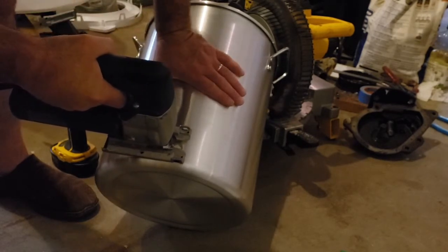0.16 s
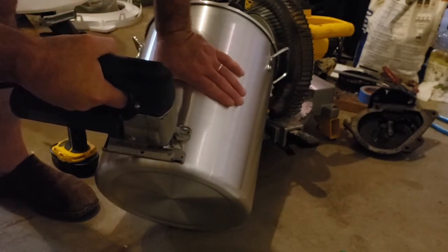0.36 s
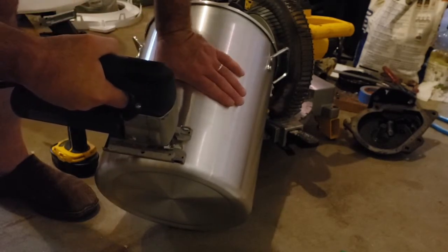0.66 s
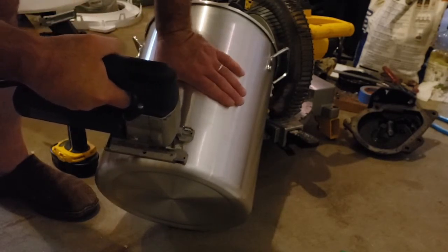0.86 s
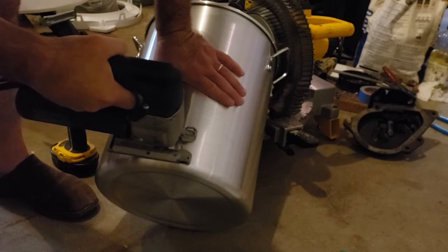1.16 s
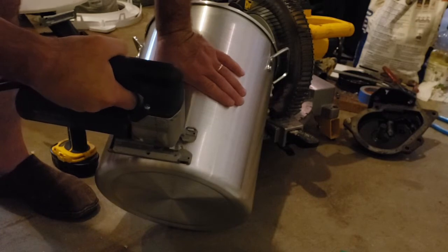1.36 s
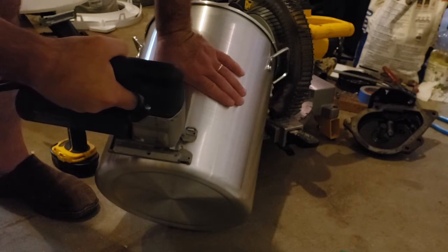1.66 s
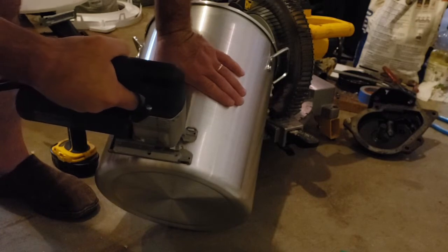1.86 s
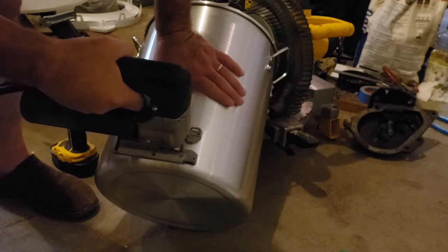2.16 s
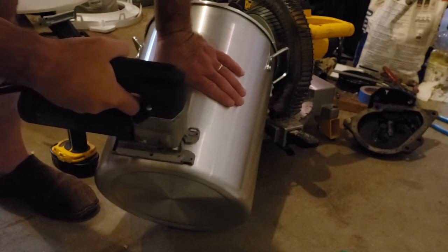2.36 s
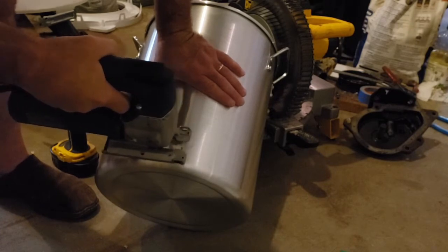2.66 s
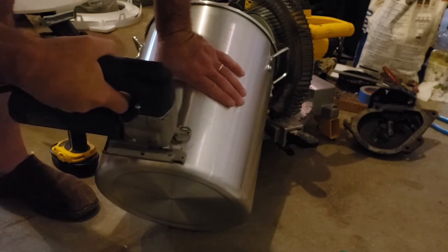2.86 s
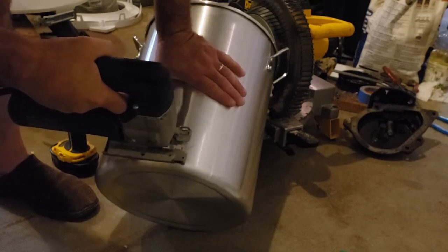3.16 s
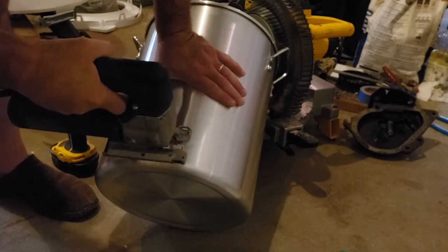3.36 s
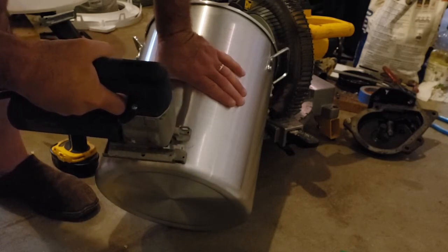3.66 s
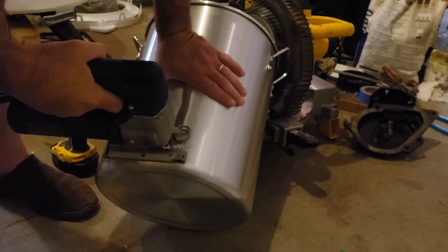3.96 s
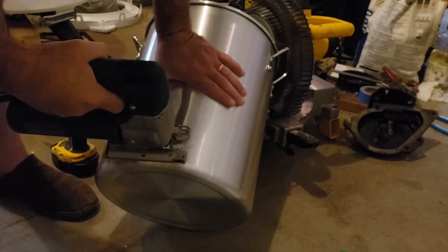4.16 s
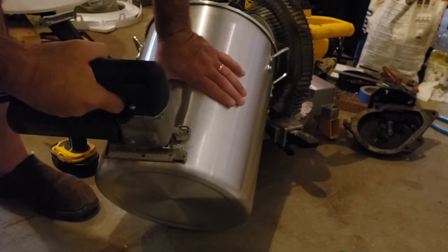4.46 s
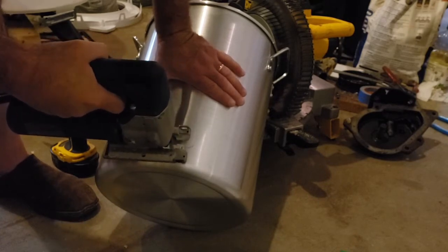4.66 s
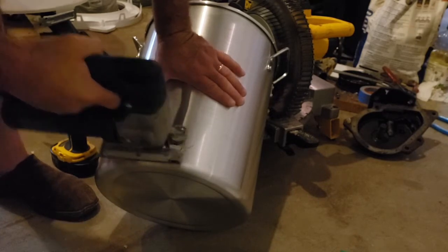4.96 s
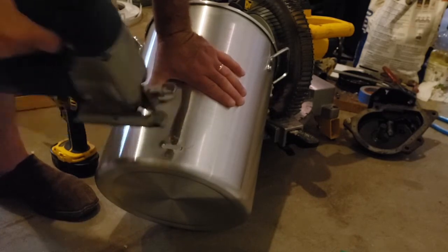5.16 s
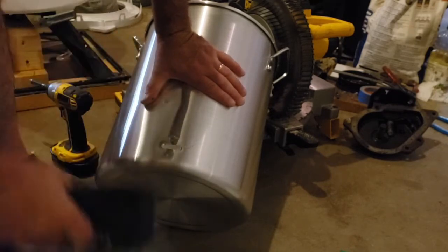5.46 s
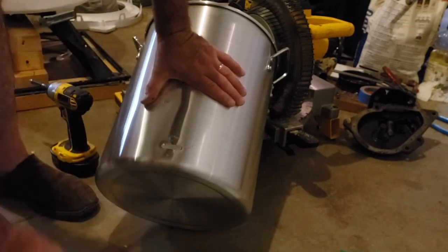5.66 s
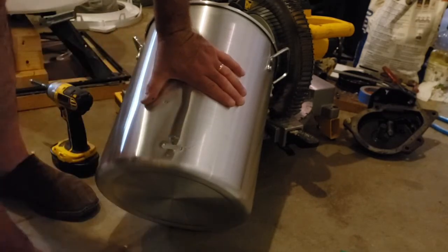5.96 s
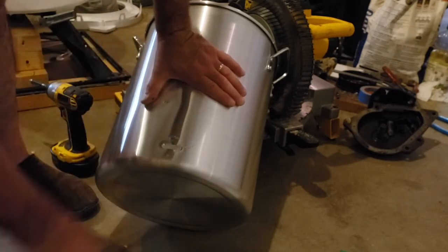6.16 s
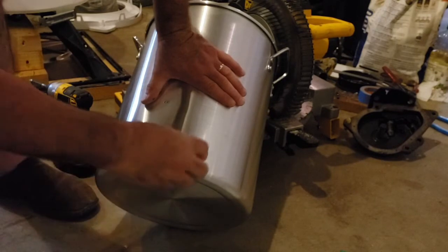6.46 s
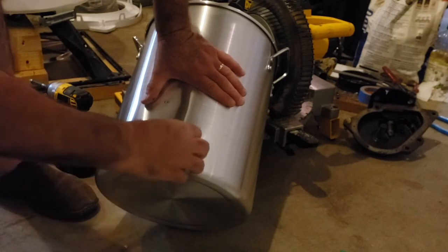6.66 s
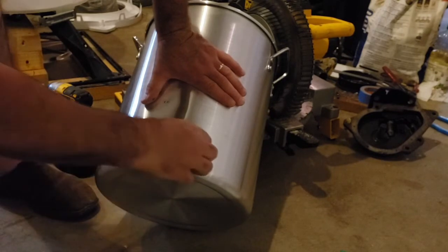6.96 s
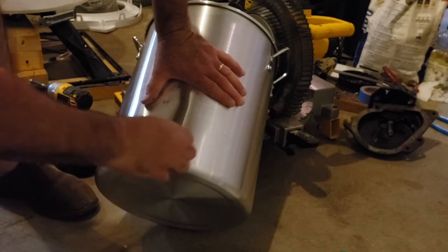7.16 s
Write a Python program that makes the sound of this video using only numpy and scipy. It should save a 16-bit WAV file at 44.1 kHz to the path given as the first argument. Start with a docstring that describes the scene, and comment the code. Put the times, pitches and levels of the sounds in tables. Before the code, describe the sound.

A jigsaw is already cutting a thin steel pot close by in a reverberant garage, slightly left. Rapid strokes, almost fifty a second, make a coarse buzz of gear rattle, bright tooth rasp and ringing wall over a motor hum. At 0.8-1.0 s the wall screeches violently in two close bursts; then a steadier rattle with a thin singing tone near 1.3 kHz until 1.6. Another loud, downward-sliding screech comes at 2.0-2.1. From about 2.4 the motor is off: a very high whine drops away, hum and rattle sink, and strokes slow into separate clunks by 4.6. The blade leaves the slot at 5.0 with a small pot ring. Quiet air, then at 5.8-6.35 a cluster of thuds, clacks and a damped steel clank on concrete, with a tiny bright snap at 6.16. Soft skin rubs at 6.5-7.0, and a crisp knock on the pot at 7.1.

```python
"""A jigsaw cuts the wall of a metal pot in a garage: gears rattle, teeth scrape, and twice the wall chatters loudly.
Clicks locked to the blade stroke drive the wall's resonances; random rattling of loose parts drives those
of the saw; rotor tones follow the motor speed. The motor is switched off and coasts down with a falling whine,
clunking once a stroke as the crank slows. The blade leaves the slot, the saw is laid on the concrete floor,
and a hand rubs and knocks the cut piece: noise crunches, dying modes and skin hiss, over still air."""
import sys
import numpy as np
from scipy import signal
from scipy.fft import rfft, irfft
from scipy.io import wavfile
from scipy.ndimage import uniform_filter1d

SR = 44100
rng = np.random.default_rng(int(sys.argv[2]) if len(sys.argv) > 2 else 0)


def put_to_file(sound):
    """Save the sound as 16-bit audio at rate SR, in the file named by the first command-line argument."""
    columns = np.atleast_2d(sound).T  # one column per channel
    safe = np.clip(columns, -1, 1)
    whole_steps = np.round(safe * 32767)
    wavfile.write(sys.argv[1], SR, whole_steps.astype(np.int16))


N = 322812
T = np.arange(N) / SR

# spectra of air, three blow colours, gears and teeth: (frequency [Hz], relative level [dB])
AIR_SPECTRUM = [(18, -47), (30, -20), (43, -7.5), (64, -3), (160, -14.5), (505, -14.5), (728, -12),
                (1050, -17.5), (1330, -15), (7460, -26), (15500, -21.5)]
KNOCK_SPECTRUM = [(60, -25), (180, -3), (280, 2), (450, -9), (900, -7.5), (1500, -11.5), (4000, -28),
                  (8000, -80)]
CLACK_SPECTRUM = [(300, -66), (800, 4), (1400, 4.5), (2800, 6), (4500, 1.5), (6300, -4.5), (7400, -17.5),
                  (8500, -19), (11000, -19), (15500, -19)]
TICK_SPECTRUM = [(3000, -46), (8400, -20), (10000, -11), (13000, 8), (15500, 4.5)]
GEAR_SPECTRUM = [(40, -41), (90, -22), (190, -23), (260, -2.5), (400, -0.5), (560, -8), (740, -1.5),
                 (1100, -3.5), (1400, -6), (2600, -12), (3300, -14.5), (5900, -17), (8300, -38),
                 (15500, -48)]
TEETH_SPECTRUM = [(60, -27), (250, -18), (800, -19.5), (1400, -0.5), (2800, 1), (4300, 1), (6000, -4.5),
                  (7200, -13.5), (8500, -20.5), (10000, -12.5), (12000, -7.5), (15500, -3)]
# decay of the garage: (frequency [Hz], t60 [s])
ROOM_T60 = [(100, 0.46), (400, 0.36), (2500, 0.36), (6000, 0.38), (14000, 0.31)]
# left-right likeness of the diffuse field: (frequency [Hz], likeness [0-1])
LIKENESS = [(60, 0.69), (280, .72), (700, 0.28), (1500, 0), (8000, 0)]
# lean to the left at share 1: (frequency [Hz], left minus right [dB])
LEFT_LEAN = [(80, -2), (350, -.5), (700, .8), (1400, 4.4), (2800, 5.4), (5500, 6.5), (9000, 2.7),
             (14000, 1.5)]
# hand sliding on the pot: (start [s], end [s], relative skin hiss [dB], relative wall judder [dB])
RUBS = [(6.5, 6.56, -63.5, -77), (6.733, 6.75, -48, -55.5), (6.78, 6.859, -60.5, -70),
        (6.89, 7.02, -66.5, -57.5)]
# blade leaving the slot, saw set down, hand on the pot:
# (time [s], thud [dB], knock [dB], clack [dB], tick [dB])
HITS = [(4.982, -63, -49.5, -47, -55), (5.43, -83, -76, -63.5, -80), (5.786, -41, -63, -38.5, -45),
        (5.818, -41, -42.5, -38.5, -48), (5.925, -47, -61, -53, -60), (5.976, -60, -50.5, -45.5, -61),
        (6.089, -43, -62, -59, -60), (6.137, -44, -29.5, -39, -54), (6.16, -38, -62, -42, -42),
        (6.243, -33, -31.5, -42.5, -50), (6.272, -39, -34, -31.5, -41.5), (6.297, -48, -45, -52, -56),
        (6.334, -39.5, -50.5, -66, -66), (7.082, -62, -46, -37.5, -52), (7.087, -59, -61, -35, -43.5),
        (7.098, -58, -42.5, -36.5, -55)]
# steel shoe meeting the floor: (time [s], relative level [dB])
CLANKS = [(5.787, -16), (5.818, -30)]
# freed pot ringing as the blade leaves it and as it is touched: (time [s], level [dB])
POT_RINGS = [(4.645, -45), (4.791, -52), (4.85, -53), (4.982, -46.5), (5.424, -67), (7.083, -54)]
# modes of the deep thud, pot, small steel part and booming wall: (frequency [Hz], relative level [dB], t60 [s])
THUD_MODES = [(53.7, 9.5, 0.41), (73.7, 1.5, 0.56), (119, 4.5, 0.44)]
POT_MODES = [(262, -22, 0.67), (424, -10, 0.69), (800, -7, 0.23), (1071, 13, 0.045), (1385, 5, 0.064),
             (1638, -5, 0.12), (2380, -7, 0.22)]
PING_MODES = [(4540, -1, 0.03), (5800, 1, 0.021), (6280, -3, 0.037), (9230, -4, 0.04), (9640, 0, 0.034),
              (12950, -1, 0.057), (13300, -8, 0.045), (14400, -8, .04)]
BOOM_MODES = [(262, -1.5, 0.16), (318, -2, .16)]
# modes of the shoe, before the floor damps them: (frequency [Hz], relative level [dB], t60 [s])
SHOE_MODES = [(2000, -17, .25), (2370, 4, 0.15), (2455, 5, 0.13), (2350, -3, 0.25), (2550, -4, 0.23),
              (2610, 3, 0.3), (2630, -11, .2), (3600, -22, .14), (4450, 0.5, 0.089), (4350, -11, 0.1)]
# upper limit of the speed, as set by the load under power: (time [s], speed [strokes/s])
CUT_SPEED = [(.7, 48.65), (.85, 48.9), (1.05, 48.9), (1.2, 49.6), (1.9, 49.7), (2, 48.8), (2.07, 47.8),
             (2.27, 48.3)]
# resonances the hum sweeps through while coasting: (frequency [Hz], width [Hz], relative level [dB])
HUM_RINGS = [(355, 59, -35.5), (300, 41, -42), (255, 16, -38)]
# saw housing and pot shaken by rattling loose parts: (frequency [Hz], width [Hz], relative level [dB])
BODY_RINGS = [(258.7, 7.8, -4.5), (323, 11, -12), (359, 9.4, -8.5), (664, 22, -10), (720.3, 8.5, -8.5),
              (1056, 43, -6.5), (2620, 200, -7), (5800, 280, -20.5)]
# rubbed blade singing: (start [s], end [s], level [dB])
SINGS = [(.98, 1.623, -32), (2.371, 2.43, -37.5)]
# wall around the slot: (frequency [Hz], width [Hz], relative level [dB])
WALL_RINGS = [(1700, 120, -0.5), (2400, 410, 0), (2850, 260, 3.5), (4040, 130, 6), (5860, 450, -1)]
# steady buzz as the blade moves along the slot: (time [s], level [dB], lower ring [Hz])
BUZZ = [(0, -23, 2180), (.16, -21, 2300), (.42, -19, 2180), (.49, -24, 2130), (.8, -19.5, 2150),
        (1.0, -25, 1750), (1.17, -23, 1600), (1.25, -38, 2500), (1.88, -37.5, 2770), (2.16, -25.5, 2550),
        (2.26, -36.5, 2680), (2.43, -39, 2800)]
# blade grabs, wall screeches: (start [s], end [s], level [dB], lower ring [Hz], its glide [Hz/s],
# upper ring [Hz], upper ring relative level [dB], blade slap relative level [dB])
GRABS = [(0.798, .94, -12.5, 2720, 902, 4440, 0.5, 7.5), (0.954, 1.008, -12.5, 2920, -600, 5260, -4.5, 4),
         (1.966, 2.11, -12, 3016, -2200, 5180, -3.5, 12), (2.416, 2.42, -27, 2696, 0, 4160, 2, 6)]

AIR_DB, EDGE_HZ = -69.5, 15820
SAW_LEFT, POT_LEFT, HAND_LEFT = 1.1, 1.2, 1.25  # shares of the left lean
RUB_RISE_S, RUB_FALL_S = 0.022, 0.022
PING_S, PING_DB = 6.162, -40  # a small steel part snaps against the shoe
BOOM_S, BOOM_DB = 7.097, -40.5  # the knuckles set the wall booming
CLUNK_DB = (-84, -48.5, -43.5, -70)  # thud, knock, clack, tick
LAST_TURN_S = 4.638  # last turn of the crank

GEAR_RATIO, WHINE_ORDER = 9.25, 356  # armature turns and whine cycles per stroke
FIRST_STROKE = .244  # strokes until the stroke count reaches zero
# dry friction [strokes/s^2] and fan drag [1/stroke] bring the crank to rest at STOP_S
FRICTION, FAN_DRAG, STOP_S = 14.6, .0054, 4.96
CUT_END_S, UNLOAD_S = 2.379, 0.083  # the teeth stop biting, and the load's fade time
HUM_DB, HUM_HOLD_S, HUM_FADE_DB_PER_S = -33, 0.53, 20
HUM_ROUGH_DB = 3.5  # flutter of the swept hum
WHINE_DB, WHINE_KNEE_HZ, WHINE_FADE_HZ = -37.5, 12800, 1240
# rattle drive: relative level at full speed unloaded, gain under load, power of the speed
RATTLE_DB, RATTLE_LOAD_DB, RATTLE_POWER = -38.5, 4, 0.58
# slow-stroke surge: depth, speed below which it shows [strokes/s], place in the stroke [turns]
SURGE_DB, SURGE_BELOW, SURGE_TURN = 3, 22, 0.065
SING_HZ, SING_RISE_S, SING_FALL_S = 1279, .07, .05
# blade in the slot: level at full speed, power of the speed
SLOT_HZ, SLOT_WIDTH_HZ, SLOT_DB, SLOT_POWER = 2707, 340, -45, 0.67
BUZZ_WIDTH_HZ, BUZZ_UPPER_HZ, BUZZ_UPPER_DB = 500, 4264, -35
BUZZ_SLAP_DB = 7.5  # relative, as in GRABS
GRAB_WIDTH_HZ, GRAB_RISE_S, GRAB_FALL_S = 750, 0.032, 0.032
# rasp of biting teeth, of sliding teeth at high speed, and of a grab relative to its screech
BITE_DB, SLIDE_DB, GRAB_RASP_DB = -29.2, -39.2, -8.2
SLIDE_POWER, SLIDE_KNEE = .5, 11.5  # power of the speed; strokes/s below which sliding dies out


def amp(db):
    """Decibels to gain."""
    return 10 ** (np.asarray(db) / 20)


def unit(x):
    """Scales to rms 1."""
    return x / np.sqrt(np.mean(x ** 2) + 1e-20)


def curves(rows):
    """Each column of a table, joined by lines over time."""
    s, *columns = np.transpose(rows)
    return [np.interp(T, s, c) for c in columns]


def read(points, hz):
    """A table read on a log-frequency axis."""
    f, value = np.transpose(points)
    return np.interp(np.log(hz + 1), np.log(f), value)


def colour(x, points, size=4096):
    """Causal minimum-phase filter with the given spectrum."""
    log_gain = np.log(amp(read(points, abs(np.fft.fftfreq(size, 1 / SR)))))
    response = np.exp(np.conj(signal.hilbert(log_gain)))
    taps = np.fft.ifft(response).real
    return signal.oaconvolve(x, taps[:size // 2])[:len(x)]


def in_band(x, lo, hi):
    """Scales so that the band lo-hi has rms 1."""
    hz = np.fft.rfftfreq(len(x), 1 / SR)
    band = irfft(rfft(x) * ((hz > lo) & (hz < hi)))
    return x / np.std(band)


def resonate(x, hz, width):
    """A resonance of gain 1 whose pitch can move."""
    turn = np.exp(2j * np.pi * np.cumsum(hz * np.ones(len(x))) / SR)
    r = np.exp(-np.pi * width / SR)
    shifted = x / turn + 1e-18  # the pitch brought down to 0 Hz
    return 2 * (turn * signal.lfilter([1 - r], [1, -r], shifted)).real


def steady(x, size=6000):
    """Holds the short-term rms near 1."""
    power = abs(uniform_filter1d(x ** 2, size))
    return x / np.sqrt(power + 1e-4 * np.mean(x ** 2))


def waver(per_s):
    """Slow random drift of rms 1."""
    return unit(np.interp(T * per_s, np.arange(4000), rng.standard_normal(4000)))


def swell(start, end, rise_s, fall_s):
    """Rises exponentially to 1 at start, holds until end, dies away."""
    return np.exp(-np.maximum(start - T, 0) / rise_s - np.maximum(T - end, 0) / fall_s)


def add(mix, s, sound):
    """Mixes a sound in at time s."""
    part = mix[round(s * SR):][:len(sound)]
    part += sound[:len(part)]


def ring(modes):
    """Dying modes, rms 1 over the first moments."""
    t = np.arange(SR) / SR
    x = sum(amp(db - 60 * t / t60) * np.sin(2 * np.pi * hz * t) for hz, db, t60 in modes)
    return x / np.std(x[:1300])


def contacts(strokes, places, sizes, jitter_s, uneven_db):
    """Clicks that recur at the same places in every stroke, a little early or late, strong or weak."""
    turns = np.arange(int(strokes[-1]))[:, None] + places
    late, strong = rng.standard_normal((2,) + turns.shape)
    at = np.interp(turns, strokes, T) + jitter_s * late
    index = np.clip(np.round(at * SR), 0, N - 1).astype(int)
    weight = sizes * amp(uneven_db * strong)
    return unit(np.bincount(index.ravel(), weight.ravel(), N))


def grit(per_s, spread_db):
    """Random clicks of uneven size."""
    size = rng.standard_normal(N) * amp(spread_db * np.minimum(rng.exponential(1, N), 4))
    return unit(size * (rng.random(N) < per_s / SR))


def pair(a, b):
    """Two unrelated signals become a diffuse stereo field, alike in the bass."""
    same = np.clip(read(LIKENESS, np.fft.rfftfreq(len(a), 1 / SR)), -1, 1)
    right = same * rfft(a) + np.sqrt(1 - same ** 2) * rfft(b)
    return np.array([a, irfft(right, len(a))])


def garage(x, wet_db, lead_s):
    """Direct sound reaches the left first; dense reflections follow and die by band."""
    taps = rng.choice([-1., 1.], (2, SR)) * (rng.random((2, SR)) < .12)
    hz, t, z = signal.stft(taps, SR, nperseg=256)
    decay = amp(-60 * t / read(ROOM_T60, hz)[:, None])
    tail = signal.istft(z * decay, SR, nperseg=256)[1][:, :SR]
    fade_in = np.clip((T[:SR] - .001) / .004, 0, 1)
    tail = pair(*(tail * fade_in))
    response = amp(wet_db) * tail / np.linalg.norm(tail[0])
    response[0, 0] += 1
    response[1, round(abs(lead_s) * SR)] += 1
    response /= np.linalg.norm(response.mean(0))
    return signal.fftconvolve(x[None], response, axes=1)[:, :N]


def lean_left(x, share):
    """A source to the left favours the left channel in the upper middle, at constant power."""
    tilt = amp(share * read(LEFT_LEAN, np.fft.rfftfreq(N, 1 / SR)))
    gains = np.array([tilt, np.ones_like(tilt)]) / np.sqrt((1 + tilt ** 2) / 2)
    return irfft(rfft(x) * gains, N)


def still_air():
    """Faint coloured noise, wide in stereo."""
    left, right = [unit(colour(rng.standard_normal(N), AIR_SPECTRUM)) for _ in range(2)]
    return amp(AIR_DB) * pair(left, right)


def rub():
    """Skin slides over the pot and makes its wall judder."""
    skin = grit(per_s=3800, spread_db=1.5)
    hiss = unit(colour(skin, CLACK_SPECTRUM)) + 0.52 * unit(colour(skin, TICK_SPECTRUM))
    judder = resonate(resonate(rng.standard_normal(N), 305, 105), 250, 100)
    judder = steady(judder, size=2500)
    out = np.zeros(N)
    for start, end, hiss_db, judder_db in RUBS:
        touch = amp(hiss_db - 4.0) * hiss + amp(judder_db - 4.0) * judder
        out += swell(start, end, RUB_RISE_S, RUB_FALL_S) * touch
    return out


def crunch(spectrum, fade_s):
    """Surfaces press together: a short burst of coloured noise."""
    t = np.arange(4000) / SR
    press = np.exp(-t / fade_s) * (1 - np.exp(-t / 0.00051))
    x = colour(rng.standard_normal(len(t)) * press, spectrum)
    return x / np.std(x[:1300])


def blows(hits):
    """Each blow crunches in three colours and sets off a slow, deep thud; steel and pot ring."""
    sharp, thuds = np.zeros(N), np.zeros(N)
    thud, shoe, pot = ring(THUD_MODES), ring(SHOE_MODES), ring(POT_MODES)
    for s, thud_db, knock_db, clack_db, tick_db in hits:
        add(thuds, s, amp(thud_db) * thud)
        add(sharp, s, amp(knock_db) * crunch(KNOCK_SPECTRUM, fade_s=.009))
        add(sharp, s, amp(clack_db) * crunch(CLACK_SPECTRUM, fade_s=.005))
        add(sharp, s, amp(tick_db) * crunch(TICK_SPECTRUM, fade_s=.004))
    for s, db in CLANKS:
        add(sharp, s, amp(db - 9.5) * shoe * np.exp(-T[:SR] / 0.013))  # the floor damps the shoe
    for s, db in POT_RINGS:
        add(sharp, s, amp(db) * pot)
    add(sharp, PING_S, amp(PING_DB) * ring(PING_MODES))
    add(sharp, BOOM_S, amp(BOOM_DB) * ring(BOOM_MODES))
    return sharp, thuds


def deep_thuds(thuds):
    """The deep thuds, trimmed of the lowest bass and 3 dB stronger on the right."""
    high_pass = signal.butter(2, 42, "high", fs=SR, output="sos")
    return signal.sosfilt(high_pass, thuds) * amp([[-1.5], [1.5]])


def clunks(strokes, count):
    """The slow crank gives one blow in each of its last strokes."""
    turns = np.interp(LAST_TURN_S, T, strokes) - np.arange(count)
    return [(s, *CLUNK_DB) for s in np.interp(turns, strokes, T)]


def stroke_rate():
    """Strokes per second: set by the load while powered, then braked by friction and fan drag."""
    angle = np.sqrt(FRICTION * FAN_DRAG) * np.maximum(STOP_S - T, 0)
    coast = np.sqrt(FRICTION / FAN_DRAG) * np.tan(angle)
    return np.minimum(curves(CUT_SPEED)[0], coast)


def rotor(strokes, speed):
    """The armature hums at its turning rate and whines at a high multiple of the stroke rate."""
    fading_db = HUM_DB - HUM_FADE_DB_PER_S * np.maximum(T - HUM_HOLD_S, 0)
    loaded = amp(fading_db + 1.4 * waver(per_s=15))
    turn_hz = GEAR_RATIO * speed
    swept = sum(amp(db) / (1 + (2 * (turn_hz - hz) / width) ** 2) for hz, width, db in HUM_RINGS)
    swept = swept * amp(HUM_ROUGH_DB * waver(per_s=60) - 2.0)
    swept *= np.minimum(2 * speed / speed[0], 1) ** 2  # fades out below half speed
    turn = 2 * np.pi * GEAR_RATIO * strokes
    hum = loaded * np.sin(turn + 0.091 * waver(per_s=40))
    hum += swept * np.sin(turn + .6 * waver(per_s=63))
    below_knee_hz = np.maximum(WHINE_KNEE_HZ - WHINE_ORDER * speed, 0)
    whine_level = np.exp(-below_knee_hz / WHINE_FADE_HZ) * amp(WHINE_DB + 2.5 * waver(per_s=35))
    whine = whine_level * np.sin(2 * np.pi * WHINE_ORDER * strokes + .3 * waver(per_s=270))
    return np.sqrt(2) * hum, np.sqrt(2) * whine


def rattling(strokes, speed, load):
    """The rattle in dB grows with speed and load, and surges in each slow stroke."""
    turn = strokes - np.interp(LAST_TURN_S, T, strokes) - SURGE_TURN
    depth_db = SURGE_DB * np.clip(2 - 2 * speed / SURGE_BELOW, 0, 1)
    surge_db = depth_db * np.cos(2 * np.pi * turn) * (turn < 0.5)
    speed_db = RATTLE_POWER * 20 * np.log10(speed / speed[0] + 1e-6)
    return RATTLE_DB + RATTLE_LOAD_DB * load + speed_db + surge_db


def housing(speed, level_db):
    """Loose parts shake the housing and the pot, whose resonances fill the room."""
    shake = steady(grit(per_s=2200, spread_db=3.0))
    bass = np.interp(speed, [5, 26, 45], [.45, .85, 1])  # a slow crank shakes the heavy parts less
    body = np.zeros(N)
    for hz, width, db in BODY_RINGS:
        tone = steady(resonate(shake, hz, width), size=9000)
        body += amp(db) * (bass if hz < 500 else 1) * tone
    return amp(level_db + 1.0) * body


def sing():
    """The rubbed blade sings on one narrow, wavering resonance."""
    level = sum(amp(db) * swell(start, end, SING_RISE_S, SING_FALL_S) for start, end, db in SINGS)
    tone = np.sin(2 * np.pi * np.cumsum(SING_HZ + 5 * waver(per_s=71)) / SR)
    return level * amp(1.8 * waver(per_s=28)) * unit(tone)


def slot_ring(speed):
    """The blade slides against the edge of the slot, which rings."""
    ringing = resonate(grit(per_s=1500, spread_db=2), SLOT_HZ, SLOT_WIDTH_HZ)
    ringing = resonate(ringing, SLOT_HZ, SLOT_WIDTH_HZ)
    return amp(SLOT_DB) * (speed / speed[0]) ** SLOT_POWER * steady(ringing)


def grabbing():
    """Strength of each grab of the blade over time."""
    return np.array([amp(db) * swell(start, end, GRAB_RISE_S, GRAB_FALL_S) for start, end, db, *_ in GRABS])


def chatter(strokes, low_hz, width_hz, high_hz, high_db, slap_db):
    """The blade slaps the thin wall once a stroke; the wall buzzes against the teeth in between."""
    slap = contacts(strokes, np.zeros(1), 1, jitter_s=.00002, uneven_db=3.5)
    buzz = contacts(strokes, rng.random(48), rng.choice([-1, 1], 48), jitter_s=.00004, uneven_db=-1.0)
    drive = buzz + amp(slap_db - 6.5) * slap
    rings = sum(amp(db) * resonate(drive, hz, width) for hz, width, db in WALL_RINGS)
    drive = 0.84 * drive + rings
    # the place of the blade in the slot decides which of the resonances speak
    low = steady(resonate(resonate(drive, low_hz, width_hz), low_hz, 1300))
    high = steady(resonate(resonate(drive, high_hz, 2100), high_hz, 1300))
    tone = [(80, -3.0), (300, -5.5), (1500, 3), (6300, 6.5), (7300, -7.5), (8500, -13), (14000, -7.5)]
    return steady(colour(low + amp(high_db) * high, tone))


def wall_buzz(strokes, load):
    """The wall chatters mildly as long as the teeth bite; its upper ring keeps one level under load."""
    level_db, ring_hz = curves(BUZZ)
    upper_db = BUZZ_UPPER_DB - level_db
    buzz = chatter(strokes, ring_hz, BUZZ_WIDTH_HZ, BUZZ_UPPER_HZ, upper_db, BUZZ_SLAP_DB)
    return np.hypot(amp(level_db), amp(BUZZ_UPPER_DB)) * load * buzz


def screech(strokes, grabs):
    """The wall chatters violently, on the rings of the strongest grab."""
    start, end, _, low_hz, glide, high_hz, high_db, slap_db = np.array(GRABS)[grabs.argmax(0)].T
    low_hz = low_hz + glide * (np.clip(T, start, end) - start)
    return grabs.max(0) * chatter(strokes, low_hz, GRAB_WIDTH_HZ, high_hz, high_db, slap_db)


def gears(strokes, level_db):
    """The crank and gear teeth rattle in each stroke, over random loose clicks."""
    clicks = contacts(strokes, rng.random(40), rng.standard_normal(40), jitter_s=.00025, uneven_db=4.5)
    loose = steady(grit(per_s=2200, spread_db=4))
    drive = steady(0.6 * steady(clicks) + loose)
    return amp(level_db - 3.5) * in_band(colour(drive, GEAR_SPECTRUM), 430, 1150)


def scrape(strokes, speed, load, grabs):
    """Teeth tear chips from the slot; the rasp swells on each pull and dulls as the blade slows."""
    slide = amp(SLIDE_DB) * (speed / speed[0]) ** SLIDE_POWER
    slide = slide * speed ** 2 / np.hypot(speed ** 2, SLIDE_KNEE ** 2)
    bite = amp(BITE_DB) * load
    grab = amp(GRAB_RASP_DB) * grabs.max(0)
    level = np.sqrt(slide ** 2 + bite ** 2 + grab ** 2)
    teeth = contacts(strokes, rng.random(60), rng.standard_normal(60), jitter_s=.00007, uneven_db=1.5)
    chips = grit(per_s=4500, spread_db=3.5) * (1 + 0.67 * np.cos(2 * np.pi * strokes))
    rasp = in_band(colour(steady(steady(teeth) + chips), TEETH_SPECTRUM), 8700, 16550)
    dull = colour(rasp, [(6000, -7.0), (11500, -3.0), (15500, -17.5)])
    slow = np.interp(speed, [16, 40], [1, 0])
    return level * (rasp + slow * (dull - rasp))


def scene():
    """Saw, blows and hand in the garage, over still air."""
    speed, grabs = stroke_rate(), grabbing()
    strokes = np.cumsum(speed) / SR - FIRST_STROKE
    load = np.exp(-np.maximum(T - CUT_END_S, 0) / UNLOAD_S)
    rattle_db = rattling(strokes, speed, load)
    hum, whine = rotor(strokes, speed)
    sharp, thuds = blows(HITS + clunks(strokes, count=8))
    cutting = gears(strokes, rattle_db) + scrape(strokes, speed, load, grabs) + slot_ring(speed)
    wall = wall_buzz(strokes, load) + screech(strokes, grabs)

    handling = garage(sharp + rub(), wet_db=0.5, lead_s=.00018)
    motor = garage(whine, wet_db=-6.5, lead_s=.00009)
    body = pair(housing(speed, rattle_db), housing(speed, rattle_db))
    pot = garage(wall, wet_db=3.5, lead_s=.00007)
    saw = garage(cutting, wet_db=6, lead_s=.00009)

    mix = still_air() + deep_thuds(thuds) + hum
    mix += lean_left(handling, HAND_LEFT)
    mix += lean_left(pot, POT_LEFT)
    return mix + lean_left(saw + motor + body + sing(), SAW_LEFT)


def record(dry):
    """The loudest peaks overload softly; then the band limit."""
    clipped = dry / (1 + (abs(dry) / 1.05) ** 6) ** (1 / 6)
    low_pass = signal.firwin(801, EDGE_HZ, window=("kaiser", 8), fs=SR)
    return signal.oaconvolve(clipped, low_pass[None], "same")


dry = scene()
out = record(dry)
put_to_file(out)
```